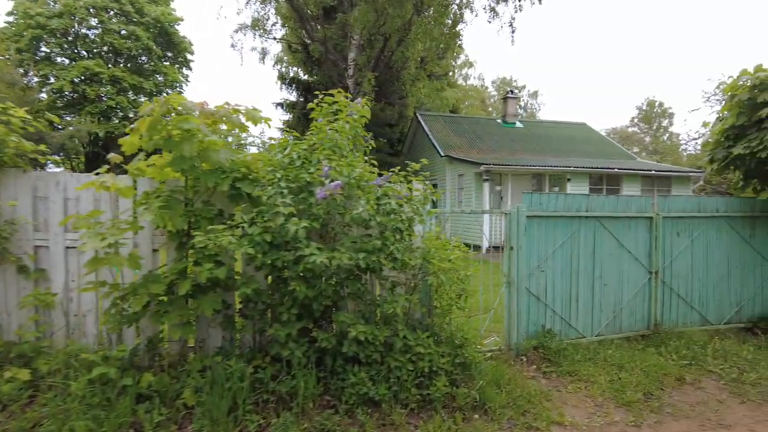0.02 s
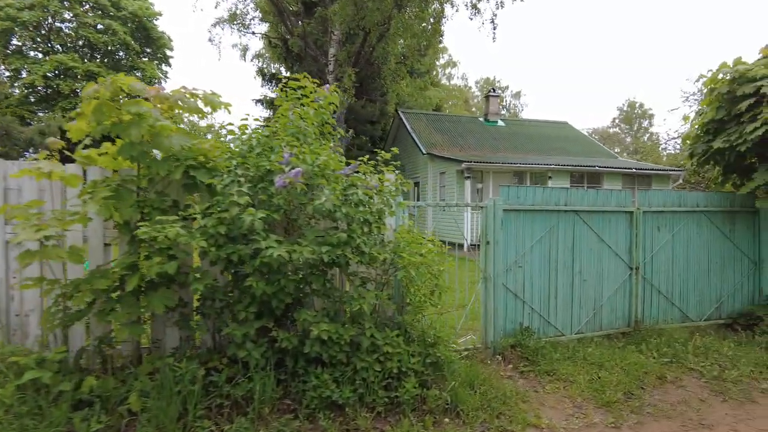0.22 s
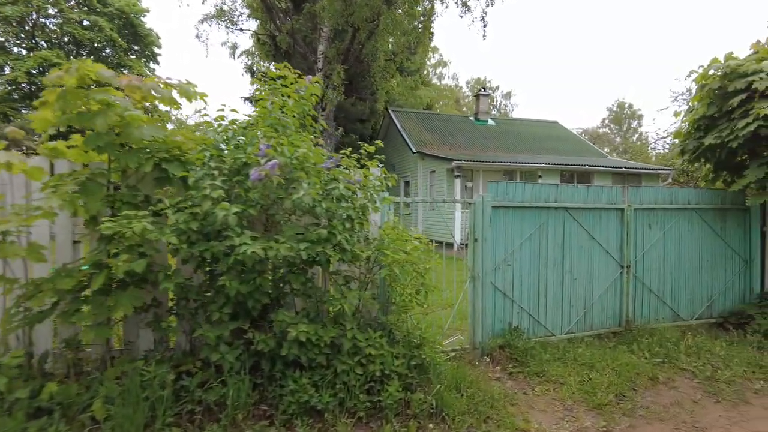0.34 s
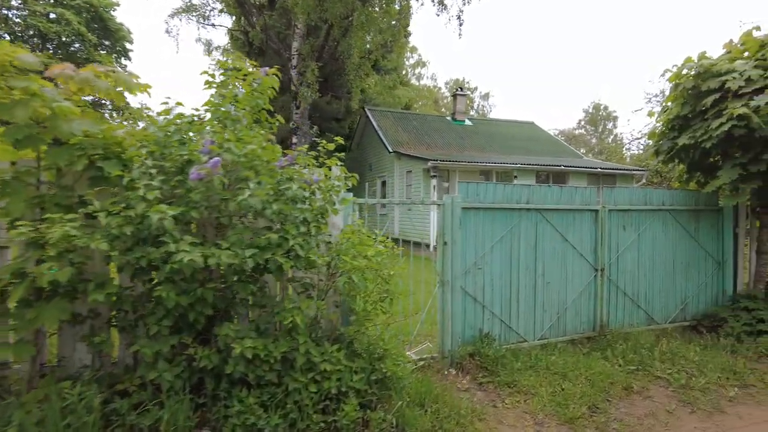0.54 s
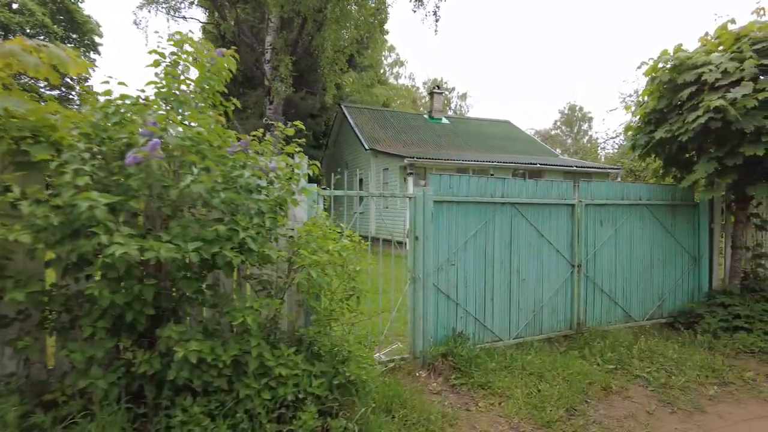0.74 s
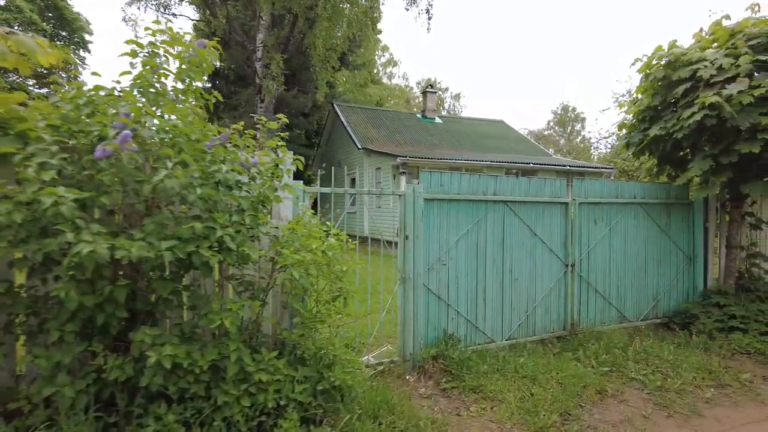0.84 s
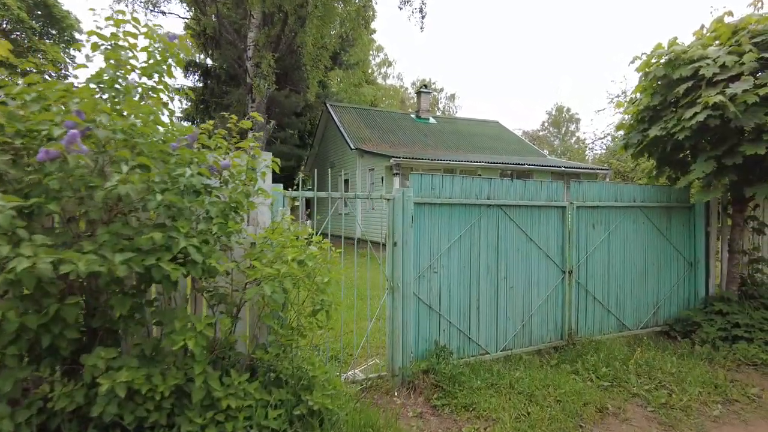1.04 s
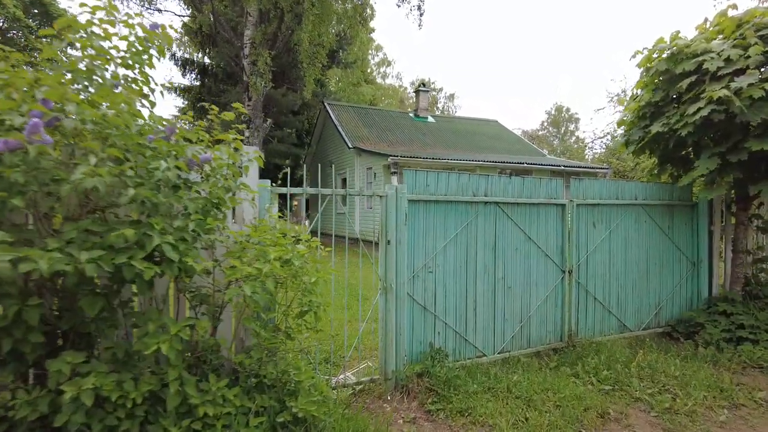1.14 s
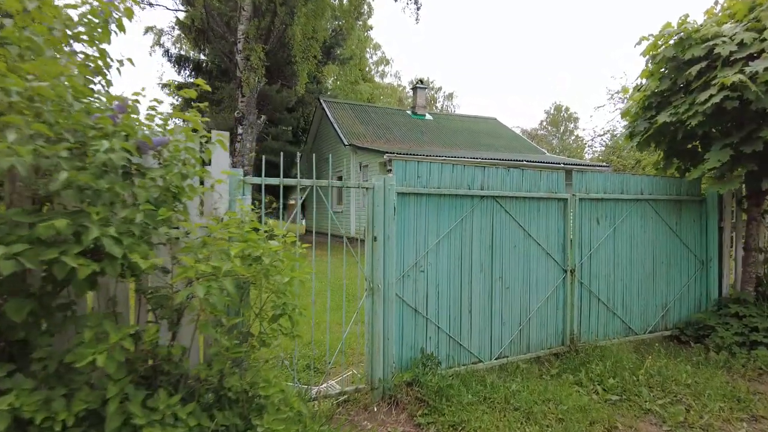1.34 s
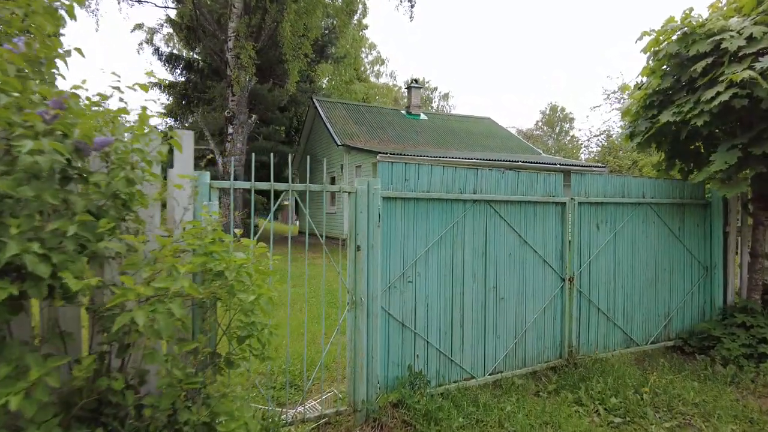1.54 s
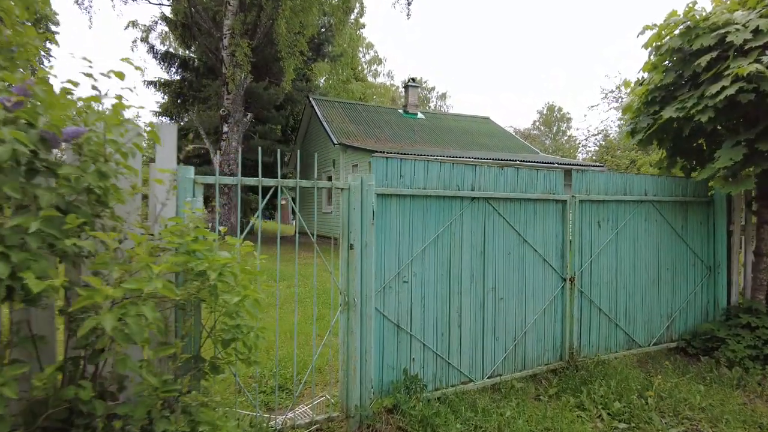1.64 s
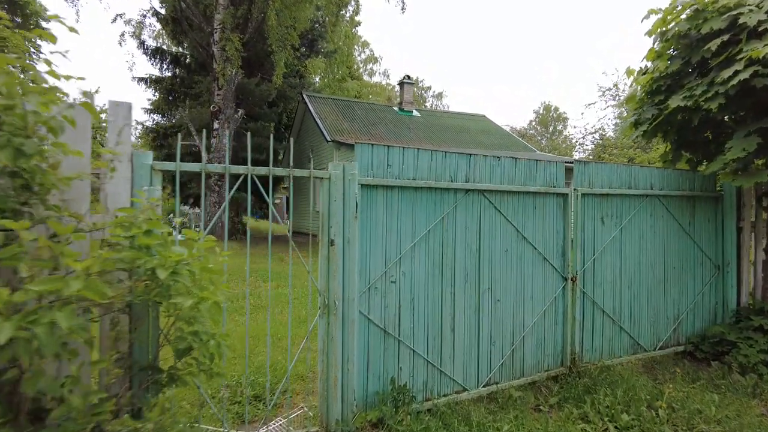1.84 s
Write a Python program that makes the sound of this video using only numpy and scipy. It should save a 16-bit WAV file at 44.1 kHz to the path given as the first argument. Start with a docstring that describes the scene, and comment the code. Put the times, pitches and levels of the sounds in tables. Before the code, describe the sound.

Shoes grind grit and snap small stones on a quiet village road, after one sharp scrape

```python
"""Slow footsteps on a dirt road in a quiet village, heard through a hand-held recorder.
Soles grind the grit in strokes of dense noisy grains; single stones snap as noise cracks with a short ring.
Thuds are heavy swings in low noise; casing clicks ring short modes; a close scrape is juddering stick-slip.
A short echo follows; air rumbles on the ports over a faint outdoor hush."""
import sys
import numpy as np
from scipy import signal
from scipy.fft import rfft, irfft
from scipy.io import wavfile

SR = 44100
rng = np.random.default_rng(int(sys.argv[2]) if len(sys.argv) > 2 else 0)


def transcribe(signal):
    """Save signal, clipped to [-1, 1], as a 16-bit WAV file at the path in sys.argv[1]."""
    frames = np.atleast_2d(signal).T
    limited = np.clip(frames, -1, 1)
    pcm = np.round(limited * 32767).astype(np.int16)
    wavfile.write(sys.argv[1], SR, pcm)


N = 83790
T = np.arange(N) / SR
FREQ = np.maximum(np.arange(N // 2 + 1) * SR / N, 1)  # Hz

SCRAPE_LAG_MS, SCRAPE_PAN_DB = 0.073, 5


def undb(db):
    """Decibels to gain."""
    return 10 ** (np.asarray(db) / 20)


def curve(table, column=1):
    """Gain over time along a level curve in dB."""
    rows = np.array(table)
    return undb(np.interp(T, rows[:, 0], rows[:, column]))


def contour(points):
    """Values per frequency from (Hz, value) points, linear in log frequency."""
    hz, value = np.array(points).T
    return np.interp(np.log(FREQ), np.log(hz), value)


def spectrum(points):
    """Gain per frequency from (Hz, dB) points, with unit mean power."""
    gain = undb(contour(points))
    return gain / np.sqrt(np.mean(gain ** 2))


def shaped(x, gain):
    """Filter with a gain per frequency."""
    return irfft(rfft(x) * gain, N)


def above(hz, edge_hz):
    """Smooth step from 0 to 1, one half at the edge frequency."""
    return 1 - 1 / (1 + (hz / edge_hz) ** 4)


def swell(peak_s, rise_s, fall_s):
    """Envelope that climbs 20 dB in the rise time and drops 20 dB in the fall time."""
    rising = (peak_s - T) / max(rise_s, 1 / SR)
    falling = (T - peak_s) / max(fall_s, 1 / SR)
    return np.exp(-np.log(10) * np.minimum(np.maximum(rising, falling), 20))


def energy_matched(x, envelope):
    """Apply an envelope to noise, then give the burst the energy of that envelope."""
    burst = x * envelope
    return burst * np.sqrt(np.sum(envelope ** 2) / np.sum(burst ** 2))


def grains(per_s, spread_db):
    """Random tiny impacts of uneven size and either sign, rms 1."""
    hits = (rng.random(N) < per_s / SR) * rng.choice([-1, 1], N)
    x = hits * undb(spread_db * np.minimum(rng.exponential(size=N), 4))
    return x / x.std()


def wobble(per_s):
    """Random unevenness that glides to a new value so many times a second."""
    return np.interp(T * per_s, np.arange(N), rng.standard_normal(N))


def from_right(x, lag_ms, pan_db):
    """A source to the right reaches the left port later; the casing shadows by frequency."""
    # casing shadow: hz, share of pan_db
    shadow_share = [(700, 0), (1300, 0), (2300, 1.22), (3200, 1), (4800, 0.19), (7000, 1.88), (9000, 1.5),
                    (12000, 0.88), (15000, 1.7)]
    late = np.exp(-2j * np.pi * FREQ * lag_ms / 1000)
    shadow = undb(pan_db / 2 * contour(shadow_share))
    return shaped(x, np.array([late / shadow, shadow]))


def ports(make, lag_ms, pan_db, spread, spread_hz):
    """A broad source on two ports: partly independent above a frequency."""
    share = spread * above(FREQ, spread_hz)
    common = shaped(make(), np.sqrt(1 - share))
    unlike = shaped(np.array([make(), make()]), np.sqrt(share))
    return from_right(common + unlike, lag_ms, pan_db)


def diffuse(pair):
    """Sound from all around, from two unrelated signals: the close ports agree in the bass only."""
    diffuse_hz = 2500
    side = shaped(pair[1], FREQ / np.hypot(FREQ, diffuse_hz))
    return np.array([pair[0] + side, pair[0] - side])


def air():
    """Faint hush, wide above the bass, and the rumble of moving air, alike on both ports."""
    # outdoor hush: hz, density_db
    hush_spectrum = [(60, 2), (200, -8.5), (400, -11), (1000, -19.5), (2500, -27), (5000, -26), (9000, -31),
                     (15500, -39)]
    # air on the ports: hz, density_db
    rumble_spectrum = [(8, -16.5), (16, 1.5), (32, 2), (55, -8.5), (100, -15), (250, -51), (1000, -76)]
    # its level: time_s, level_db
    rumble_level = [(0, -58), (.21, -70), (.26, -43), (.44, -60), (.65, -61), (.75, -51), (1.0, -55.5),
                    (1.36, -51), (1.55, -59), (1.72, -64), (1.87, -49)]
    hush_db = -65.5
    hush = diffuse(shaped(rng.standard_normal((2, N)), spectrum(hush_spectrum)))
    rumble = shaped(rng.standard_normal(N), spectrum(rumble_spectrum))
    return undb(hush_db) * hush + curve(rumble_level) * rumble


def pebbles():
    """Sparse small stones of six sizes, each with a very short ring, rms 1."""
    count, low_hz, high_hz = 6, 1477, 4295
    total_per_s, ring_20db_s = 130, 0.0022
    age, out = T[:SR // 100], np.zeros(N)
    for hz in np.geomspace(low_hz, high_hz, count):
        ring = np.sin(2 * np.pi * hz * age) * 10 ** (-age / ring_20db_s)
        out += signal.oaconvolve(grains(total_per_s / count, spread_db=2.0), ring)[:N]
    return out / out.std()


def crunch(start_s, end_s):
    """Grit grinds under the sole in strokes, and single stones snap and ring."""
    # strokes on the grit: peak_s, rise_s, fall_s, level_db, treble_db, low_mid_db
    strokes = [(0.013, 0.11, 0.12, -56, -0.5, -9), (.2, 0.092, 0.27, -64, 0.5, 8.5),
               (0.449, 0.85, 0.2, -61.5, -3, 5.5), (0.617, 0.084, 0.042, -53, -6, -14),
               (0.677, 0.0044, 0.01, -64, -7, 15), (.697, 0.033, 0.1, -47.5, -32, -9),
               (.72, 0.031, 0.025, -50, 6, -5), (0.79, 0.23, 0.088, -58.5, -22, 6),
               (.845, 0.1, 0.15, -51.5, -3.5, -1), (0.909, 0.004, 0.0085, -48, -3, 4),
               (0.924, 0.017, 0.047, -55, -33, -7), (0.972, 0.04, 0.059, -58, 2.5, 7.5),
               (1.019, 0.03, 0.057, -71.5, -12, 29), (1.059, 0.11, 0.15, -68, 8, -1.5),
               (1.315, 0.18, 0.11, -68.5, 9, 6), (1.361, 0.069, 0.048, -52, -23, 10),
               (1.378, 0.0098, 0.033, -67, 1, 18), (1.47, 0.098, 0.065, -58.5, -29, 9),
               (1.564, 0.23, 0.084, -69, 7, 3)]
    # grit: hz, density_db
    grit_spectrum = [(150, 1.5), (400, -0.5), (900, -9), (1150, -8), (1600, -1), (2150, -6.5), (2900, 0),
                     (4200, -1), (5500, 1), (7500, -1.5), (11000, -5.5), (15500, -9.5)]
    # snapping stones: peak_s, level_db, fall_s, treble_db, low_mid_db, ring_hz
    snaps = [(0.198, -49, 0.0033, -9, -1.5, 2900), (0.686, -42.5, 0.0044, -5, -4, 2900),
             (0.711, -41.5, 0.0027, 1, -12, 2900), (0.7205, -62, 0.0026, 5, 6, 1320),
             (.7335, -40.5, 0.0053, -10, 9, 2000), (0.747, -44, 0.0017, -11, -20, 3000),
             (0.7528, -40, 0.0017, -17, -2, 2600), (0.763, -53, 0.0023, -16, -11, 2980),
             (0.8038, -40.5, 0.004, -3, 8, 2550), (0.8295, -48, 0.0033, -15, -2, 3100),
             (.8462, -47, 0.0031, -11, 4, 1720), (0.9047, -52, .003, 10, -19, 7040),
             (0.9087, -39, 0.0023, 2.5, -4, 4400), (0.918, -45, 0.0023, 0, -3, 3000),
             (0.9215, -35, 0.002, -13, -10, 6700), (1.007, -70, 0.0018, 0, -14, 7160),
             (1.118, -57.5, 0.0025, 8, 7.5, 6900), (1.3132, -41, 0.0045, -4.5, 6, 7100),
             (1.314, -41.5, 0.0017, -2, -7, 2880), (1.3495, -39.5, 0.0065, -14, 0.5, 2920),
             (1.354, -54, 0.0033, 6, -1, 3400), (1.3578, -39.5, 0.0042, -0.5, -5, 3080),
             (1.3665, -32.5, 0.0045, -10.5, 4, 7370), (1.378, -48, 0.0045, -12, 4, 1500),
             (1.383, -41, 0.0061, -26, 1.5, 910), (1.495, -58, .002, 7, -10, 7200),
             (1.592, -46.5, .002, -3, -15, 5900), (1.6072, -53.5, 0.0025, -4, 1, 6100)]
    # snap: hz, density_db
    stone_spectrum = [(200, -14), (700, -0.5), (1400, 3), (2200, -3.5), (3100, -5.5), (4800, -3.5),
                      (7300, 2), (9500, -6), (15500, -0.5)]
    grains_per_s, grain_spread_db, dust_share = 2600, 4.5, 0.5
    pebble_db, surge_db, surges_per_s = -12, 1.8, 260
    ring_db, ring_fall_s = -2, 0.0017  # ring level relative to the snap

    out, grit, stone = np.zeros(N), spectrum(grit_spectrum), spectrum(stone_spectrum)
    high, low = above(FREQ, 5200), 1 - above(FREQ, 1200)
    coarse = np.sqrt(1 - dust_share) * grains(grains_per_s, grain_spread_db)
    dust = np.sqrt(dust_share) * rng.standard_normal(N)
    grinding = coarse + dust + undb(pebble_db) * pebbles()
    grinding *= undb(surge_db * wobble(surges_per_s))
    cracking = rng.choice([-1., 1.], N)
    for at, rise, fall, db, treble_db, low_db in strokes:
        if start_s <= at < end_s:
            tone = grit * undb(db + treble_db * high + low_db * low)
            out += shaped(grinding * swell(at, rise, fall), tone)
    for at, db, fall, treble_db, low_db, ring_hz in snaps:
        if start_s <= at < end_s:
            tone = stone * undb(db + treble_db * high + low_db * low)
            out += shaped(cracking * swell(at, 0.00029, fall), tone)
            ring = np.sin(2 * np.pi * ring_hz * (T - at)) * swell(at, 0.00021, ring_fall_s)
            out += undb(db + ring_db) * ring
    return out


def steps():
    """The feet sound from the right, then nearer the middle."""
    turn_s, spread = 1.15, 0.78
    early = ports(lambda: crunch(-np.inf, turn_s), lag_ms=0.069, pan_db=2.5, spread=spread, spread_hz=6000)
    late = ports(lambda: crunch(turn_s, np.inf), lag_ms=0.037, pan_db=2, spread=spread, spread_hz=2000)
    return early + late


def thuds():
    """Soft blows, each a short heavy swing in low noise, nearly alike on both ports."""
    # footfalls and grip: peak_s, rise_s, fall_s, noise_db, upper_edge_hz, swing_db, swing_hz
    blows = [(0.061, 0.014, 0.02, -59, 221, -47.5, 151), (.127, .005, 0.029, -55, 294, -49, 194),
             (0.2358, 0.0019, 0.06, -47, 463, -38, 318), (0.365, 0.039, 0.035, -51.5, 203, -41, 126.7),
             (0.487, 0.0049, 0.04, -54, 260, -48.5, 206), (0.687, 0.0032, 0.047, -53, 385, -46, 248),
             (0.7209, 0.0035, 0.028, -49, 450, -42, 300), (0.746, 0.0044, 0.011, -56, 408, -55, 302),
             (0.811, 0.01, 0.034, -50.5, 240, -51.5, 125), (0.88, 0.013, 0.076, -59, 282, -51, 140),
             (.921, 0.017, 0.029, -59.5, 327, -54, 230), (0.992, 0.053, 0.017, -54, 333, -45.5, 206),
             (1.025, 0.019, 0.021, -56.5, 382, -64, 283), (1.297, 0.011, 0.037, -48.5, 320, -43, 187),
             (1.348, 0.028, 0.018, -53.5, 253, -43.5, 158), (1.385, 0.004, .014, -52, 480, -45, 330),
             (1.437, 0.012, 0.035, -54, 278, -47, 191), (1.462, 0.013, 0.026, -49.5, 257, -56, 129),
             (1.515, 0.002, 0.06, -52, 303, -54, 174), (1.572, 0.012, 0.099, -59.5, 250, -56.5, 220),
             (1.642, 0.01, .03, -59, 240, -52.5, 165), (1.808, 0.0047, 0.028, -55, 159.5, -45, 89.4),
             (1.866, 0.012, 0.045, -55, 342, -55.5, 270)]
    low_hz, order = 70.8, 3.2
    swing_cycles = 0.65  # from the peak to 1/e
    out = np.zeros(N)
    for at, rise, fall, db, edge_hz, swing_db, swing_hz in blows:
        band = above(FREQ, low_hz) / np.sqrt(1 + (FREQ / edge_hz) ** (2 * order))
        blow = energy_matched(shaped(rng.standard_normal(N), band), swell(at, rise, fall))
        cycles = swing_hz * (T - at)
        swing = np.cos(2 * np.pi * cycles) * np.exp(-np.minimum((cycles / swing_cycles) ** 2, 20))
        out += undb(db) * blow + undb(swing_db) * swing
    return from_right(out, lag_ms=0.044, pan_db=0)


def clicks():
    """Casing clicks in the hand: a noise tick and the casing's short, damped modes."""
    # clicks: start_s, level_db, treble_db, bass_db
    hits = [(0.1251, -50, 2, 6), (0.3141, -36, -13.5, -19), (0.4854, -40.5, -0.5, -7),
            (0.8726, -40, -6.5, -2.5), (0.9257, -45, -8, -10), (0.935, -43, -0.5, -12),
            (1.3138, -45, -14, 1.5), (1.3657, -45, -18, -12), (1.3972, -45.5, -6, -3), (1.42, -53, -1, -6),
            (1.434, -54, -14, 1), (1.5119, -41, 3.5, 9), (1.641, -53, -18.5, -16), (1.862, -53.5, 7.5, 9)]
    # casing modes: centre_hz, level_db, t60_s
    modes = [(237, -20.5, 0.05), (345, -9.5, 0.048), (680, -23.5, 0.0131), (910, -14, 0.073),
             (1234, -13, 0.045), (1773, 4, 0.01), (1960, -1.5, 0.013), (2770, -2, .006),
             (2920, -4.5, 0.007), (4017, -1.5, 0.007), (4380, 2.5, 0.0061), (6000, -3, .0022),
             (7530, -22.5, .004)]
    tick_db, tick_fall_s, treble_edge_hz, bass_edge_hz = -4.5, 0.012, 2480, 600
    detune = 0.0053  # random pitch spread per click, share of centre_hz
    centre_hz, mode_db, t60_s = np.array(modes).T
    signs = (-1) ** np.arange(len(centre_hz))
    tick_band = above(FREQ, 1200) * (1 - 0.94 * above(FREQ, 6500))
    out = np.zeros((2, N))
    for at, db, treble_db, bass_db in hits:
        age = np.maximum(T - at, 0)[:, None]
        hz = centre_hz * (1 + detune * rng.standard_normal(len(centre_hz)))
        tilt_db = treble_db * above(hz, treble_edge_hz) + bass_db * (1 - above(hz, bass_edge_hz))
        gain = undb(mode_db + tilt_db) * signs
        ring = (np.sin(2 * np.pi * hz * age) * np.exp(-np.log(1000) * age / t60_s)) @ gain
        tick = shaped(rng.standard_normal((2, N)) * swell(at, 0.00031, tick_fall_s), tick_band)
        out += undb(db) * (ring + undb(tick_db + treble_db) * tick)
    return from_right(out, lag_ms=.015, pan_db=3.5)


def rub(start_s, end_s):
    """Dense, juddering stick-slip: a bright hiss over a lower rasp."""
    # scrape, before the trims: time_s, hiss_relative_db, rasp_relative_db
    strength = [(0.237, -29, -40.5), (.25, -23, -33.5), (0.261, -21, -34), (0.27, -22, -31.5),
                (.275, -24.5, -45.5), (0.283, -23.5, -44.5), (.287, -26.5, -46.5), (0.293, -30.5, -47),
                (0.299, -39.5, -52), (.312, -47.5, -58), (.335, -64.5, -72)]
    # hiss: hz, density_db
    hiss_spectrum = [(300, -33), (1500, -16), (2300, -9.5), (3000, 3.5), (3900, 1.5), (4500, 3),
                     (5200, -10), (6100, 4.5), (7200, -0.5), (9200, -2.5), (11000, -1.5), (13200, -6),
                     (15500, -3.5)]
    # rasp: hz, density_db
    rasp_spectrum = [(100, -23), (300, 1), (450, -8.5), (650, 0.5), (1100, 0.5), (1450, 13.5), (2100, -1.5),
                     (2900, 12.5), (3500, 7), (5000, -11), (9000, -20)]
    # surfaces catch: peak_s, extra_db, fall_s
    catches = [(0.234, 0.5, 0.0022), (0.2448, 8, 0.003), (0.253, 1.5, 0.0033), (0.2632, 2.5, 0.0073),
               (0.265, -1.5, 0.0078), (.281, -2.5, 0.0032), (0.29, 5.5, 0.0054)]
    slips_per_s, slip_spread_db = 18000, 1.65
    judder_db, judder_per_s = 1.04, 1000
    hiss_trim_db, rasp_trim_db = 2.5, 3.5
    judder = undb(judder_db * wobble(judder_per_s))
    catch = undb(sum(db * swell(at, 0, fall) for at, db, fall in catches))
    slips = grains(slips_per_s, slip_spread_db) * judder * catch
    slips *= (T >= start_s) & (T < end_s)
    hiss = shaped(slips * curve(strength, column=1), spectrum(hiss_spectrum))
    # 1j: a quarter cycle out of phase with the hiss
    rasp = shaped(slips * curve(strength, column=2), 1j * spectrum(rasp_spectrum))
    return undb(hiss_trim_db) * hiss + undb(rasp_trim_db) * rasp


def scrape():
    """Close scrape from the right; its lag and spread shift as it slides past."""
    start_s, turn_s, end_s = .2348, .277, .335
    early = ports(lambda: rub(start_s, turn_s), SCRAPE_LAG_MS, SCRAPE_PAN_DB, spread=0.63, spread_hz=9500)
    late = ports(lambda: rub(turn_s, end_s), lag_ms=0.078, pan_db=SCRAPE_PAN_DB, spread=0.5, spread_hz=2500)
    return early + late


def cracks():
    """Coarse grains give way in short noise bursts and add body to the scrape."""
    # cracking grains: peak_s, level_db
    bursts = [(0.236, -33.5), (0.2517, -32.5), (0.2544, -31), (0.2669, -31.5), (0.2699, -33.5),
              (0.2939, -40)]
    # crack: hz, density_db
    crack_spectrum = [(100, -23), (300, 4), (800, -1), (1400, -2), (2200, -10), (5000, -23)]
    rise_s, fall_s = 0.0007, 0.0017
    x = np.zeros(N)
    for at, db in bursts:
        x += undb(db) * energy_matched(rng.standard_normal(N), swell(at, rise_s, fall_s))
    return from_right(shaped(x, spectrum(crack_spectrum)), SCRAPE_LAG_MS, SCRAPE_PAN_DB)


def echo(x):
    """Ground, fence and bushes scatter a short, faint tail of decaying noise."""
    # echo colour: hz, density_db
    echo_spectrum = [(200, -4), (1500, 9.5), (2300, -1.5), (3200, -6), (4800, 8), (6500, -5), (9000, -0.5),
                     (15500, -6.5)]
    echo_db, t60_s, delay_s = -28, 0.22, 0.029
    tail = rng.standard_normal((2, N)) * np.exp(-np.log(1000) * T / t60_s) * (T > delay_s)
    tail /= np.linalg.norm(tail, axis=1)[:, None]
    scattered = signal.fftconvolve(x[1:], tail, axes=1)[:, :N]  # fed by the right port
    return undb(echo_db) * diffuse(shaped(scattered, spectrum(echo_spectrum)))


def scene():
    """Steps, scrape and clicks with their echo, over thuds and air."""
    near = steps() + scrape() + cracks() + clicks()
    return near + echo(near) + thuds() + air()


def record(dry):
    """The recorder widens the low end of the stereo picture and cuts the top."""
    # stereo widening: hz, side_gain_db
    widening = [(60, 15.5), (200, 15.5), (400, 14.5), (650, 13.5), (1000, 15.5), (1500, 3.5), (2500, 1.5),
                (15000, -1)]
    top_hz = 15800
    mid = (dry[0] + dry[1]) / 2
    side = shaped((dry[0] - dry[1]) / 2, undb(contour(widening)))
    top_cut = signal.ellip(12, .2, 80, top_hz, fs=SR, output="sos")
    return signal.sosfilt(top_cut, np.array([mid + side, mid - side]))


dry = scene()
out = record(dry)
transcribe(out)
```